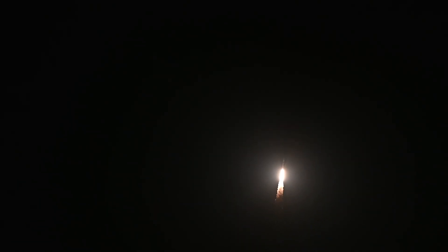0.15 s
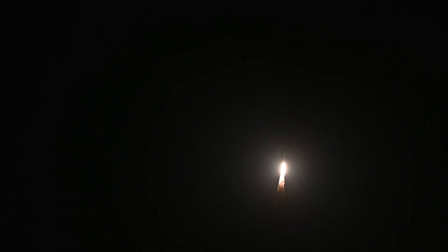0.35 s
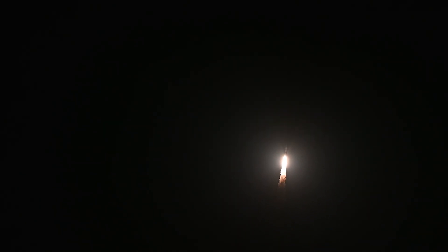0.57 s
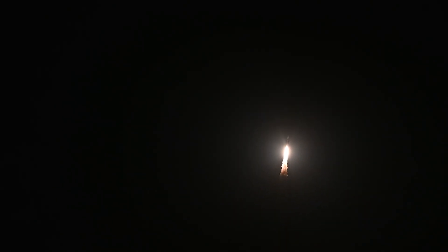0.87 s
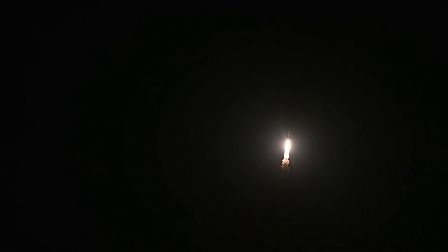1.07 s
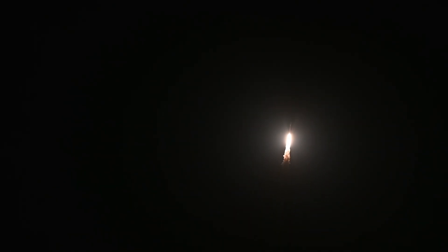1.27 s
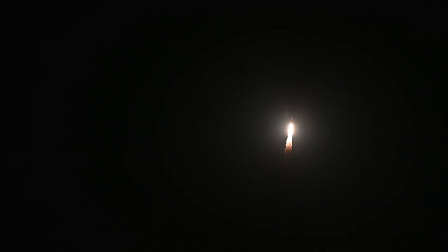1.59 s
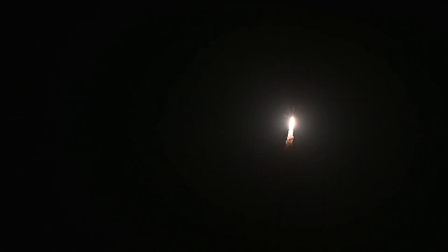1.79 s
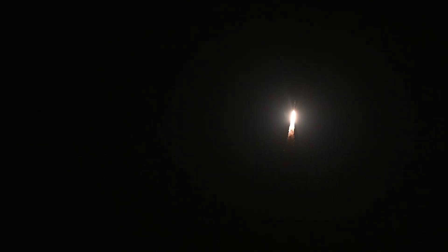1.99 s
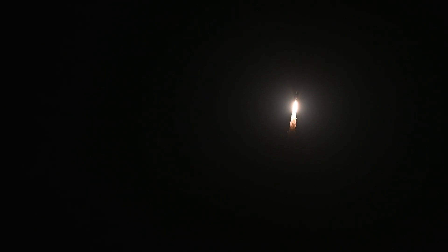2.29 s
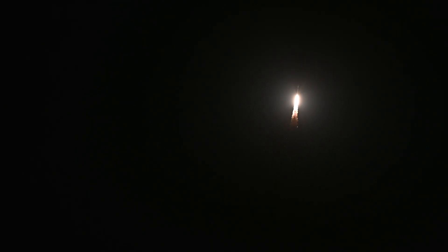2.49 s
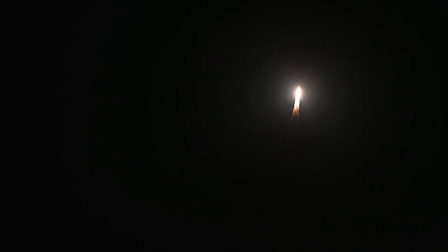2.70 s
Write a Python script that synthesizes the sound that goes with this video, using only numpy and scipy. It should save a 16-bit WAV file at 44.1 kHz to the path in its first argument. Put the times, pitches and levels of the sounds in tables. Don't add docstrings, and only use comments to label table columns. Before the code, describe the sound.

A distant rocket climbs at night, its deep roar rumbling steadily under ragged, sharpening crackle

```python
import sys
import numpy as np
from scipy import signal
from scipy.io import wavfile
from scipy.ndimage import uniform_filter1d

SR = 44100
rng = np.random.default_rng(int(sys.argv[2]) if len(sys.argv) > 2 else 0)


def volts(x):
    e = np.asarray(x, float) / 20
    return 10 ** e


def generate_wav(signal):
    frames = np.transpose(np.atleast_2d(signal))
    scaled = np.clip(frames, -1, 1) * 32767
    pcm = np.round(scaled).astype(np.int16)
    wavfile.write(sys.argv[1], SR, pcm)


N = 125685
LEAD_IN = 4096

# arrival in seconds, edge strength in dB, rise time in ms.
FRONTS_HAZY = [(0.0549, -35, 0.83), (0.0709, -30, 0.39), (0.0908, -40, 0.35), (0.1585, -31.5, 0.28),
               (0.1772, -37.5, 0.29), (0.1908, -38.5, 0.31), (0.2154, -33, 0.34), (0.2404, -35, 0.3),
               (0.2644, -36, 0.35), (0.2777, -31, 0.25), (0.29, -39, 0.19), (0.3103, -38.5, 0.79),
               (0.3373, -34.5, 0.27), (0.3473, -33.5, 0.29), (0.3612, -32.5, 0.79), (0.4107, -33.5, 0.225),
               (0.433, -47, 0.4), (0.4471, -43, 0.76), (0.4649, -35, 0.27), (0.4756, -33.5, 0.44),
               (0.4935, -34.5, 0.97), (0.5119, -30.5, 0.35), (0.535, -37.5, 0.53), (0.5794, -42, 0.85),
               (0.5907, -32.5, 0.3), (0.6082, -35, 0.4), (0.622, -38.5, 0.74), (0.6368, -36, 0.48),
               (0.6677, -29, 0.45), (0.699, -32, 0.49)]
FRONTS_CLEARING = [(0.72, -44, 0.28), (0.73, -60.5, 0.4), (0.7629, -30.5, 0.24), (0.803, -43.5, 0.113),
                   (0.8161, -34, 0.34), (0.874, -37.5, 0.3), (0.8583, -37, 0.37), (0.9205, -41.5, 0.21),
                   (0.9453, -27, 0.24), (0.9764, -39, 0.24), (0.993, -38.5, 0.47), (1.0091, -33.5, 0.28),
                   (1.029, -41.5, 0.94), (1.0997, -31, 0.5), (1.1222, -29.5, 0.21), (1.1397, -32, 0.25),
                   (1.186, -37.5, 0.088), (1.206, -58, 0.3), (1.2168, -34.5, 0.082), (1.2453, -37.5, 0.35),
                   (1.279, -32, 0.11), (1.2902, -30.5, 0.89), (1.3043, -44, 0.32), (1.3214, -59.5, 0.45),
                   (1.3321, -29.5, 0.34), (1.3533, -58, 0.89), (1.3888, -26.5, 0.31), (1.4119, -29.5, 0.24),
                   (1.4551, -35, 0.46), (1.481, -29, 0.24)]
FRONTS_BURST = [(1.5028, -26.5, 0.35), (1.514, -56.5, 1), (1.5218, -36.5, 0.73), (1.553, -38, 0.8),
                (1.5632, -36, 0.7), (1.6101, -33.5, 0.49), (1.6235, -34.5, 0.72), (1.6397, -34.5, 0.69),
                (1.6572, -30.5, 0.3), (1.678, -30, 0.46), (1.694, -35.5, 0.82), (1.717, -29.5, 0.42),
                (1.7364, -34, 0.64), (1.7621, -22, 0.12), (1.789, -18.5, 0.1), (1.815, -30.5, 0.2),
                (1.8287, -28.5, 0.61), (1.8645, -31.5, 0.45), (1.8827, -38, 0.29), (1.9064, -23, 0.28),
                (1.9217, -24, 0.17), (1.949, -68, 0.327), (1.9584, -26, 0.26), (1.9828, -21, 0.16),
                (1.9953, -30.5, 1), (2.0166, -32, 0.49), (2.0324, -24.5, 0.19), (2.0592, -28, 0.27),
                (2.0745, -41, 0.45), (2.0958, -35.5, 0.4)]
FRONTS_CLEAR = [(2.125, -25, 0.15), (2.145, -25, 0.16), (2.1958, -32, 0.3), (2.2219, -25.5, 0.21),
                (2.2329, -29.5, 0.2), (2.2431, -26.5, 0.2), (2.263, -30, 0.21), (2.285, -19.5, 0.071),
                (2.3036, -37, 0.81), (2.3178, -26.5, 0.36), (2.3607, -28.5, 0.49), (2.4066, -31.5, 0.42),
                (2.4237, -36, 0.45), (2.4529, -27.5, 0.15), (2.5045, -22.5, 0.19), (2.5315, -35.5, 0.17),
                (2.5685, -22, 0.14), (2.6011, -38, 0.23), (2.612, -40.5, 0.36), (2.6342, -32.5, 0.47),
                (2.648, -36, 0.41), (2.686, -49, 0.35), (2.7079, -23, 0.4), (2.7202, -33.5, 0.68),
                (2.7319, -30.5, 0.35), (2.7675, -21, 0.18), (2.7824, -31.5, 0.34), (2.797, -43, 0.32),
                (2.8064, -28, 0.36), (2.8267, -32, 0.63)]
FRONTS_BETWEEN = [(1.8602, -29, 0.4), (2.2078, -37, 0.39), (2.4428, -39, 0.17), (2.8412, -29, 0.35)]

# delay in ms, signed gain.
REFLECTIONS = [
    (.55, 0.2),
    (3.3, 0.25),
    (5.0, 0.098),
    (8.8, 0.1),
    (26, 0.17),
]

# time in seconds, depth in dB, half width in ms.
POCKETS_HAZY = [(0.0557, -19, 0.85), (0.0703, -18, 1.2), (0.1305, -17, 0.77), (0.2151, -15.5, 0.78),
                (0.2781, -16, 0.76), (0.2906, -16, 0.78), (0.3363, -17.5, 2), (0.3618, -20, 1),
                (0.3798, -25, 1), (0.4422, -30, 2.1), (0.4656, -18, 0.81), (0.4934, -17.5, 0.75),
                (0.5046, -18, 0.9), (0.5124, -18, 1.03), (0.5279, -22, 1), (0.577, -15, 2.1),
                (0.58, -14, 0.9), (0.595, -22, 0.64), (0.6079, -25, 2), (0.6162, -23, 1),
                (0.6682, -18, 0.64), (0.6716, -18.5, 1), (0.7658, -18, 0.69), (0.7775, -19.5, 1.35),
                (0.8527, -22.5, 2.3), (1.0346, -18.5, 1.4), (1.0994, -18, 1.9), (1.1461, -17.5, 1.66),
                (1.2495, -25, 2.4), (1.3192, -23, 1.4), (1.3912, -15, 0.94), (1.413, -26, 1.5),
                (1.4424, -25, 2.9), (1.4831, -21, 1), (1.6381, -16.5, 1.6), (1.6595, -21, 1.2),
                (1.7227, -18.6, 1.5), (1.7643, -15.3, 0.75)]
POCKETS_CLEAR = [(1.7908, -15.5, 0.66), (1.8173, -18, 0.6), (1.8292, -14, 1), (1.8888, -22, 1.2),
                 (1.9236, -16, 0.76), (1.9602, -17.5, 0.79), (1.9843, -18.5, 0.62), (1.9975, -17.5, 0.73),
                 (2.0144, -19.5, 0.85), (2.034, -16.5, 0.74), (2.0614, -19, 1), (2.1082, -21.5, 1.9),
                 (2.1271, -16.5, 0.83), (2.137, -21.0, 0.84), (2.1471, -14.2, 0.75), (2.1822, -20, 0.86),
                 (2.2235, -12.6, 0.87), (2.2344, -14, 0.83), (2.2449, -13, 0.93), (2.2613, -17.5, 0.74),
                 (2.2866, -12.5, 0.77), (2.2918, -14, 0.97), (2.3194, -16.7, 1.1), (2.4457, -21.5, 1.3),
                 (2.4545, -14.5, 0.67), (2.488, -18.3, 1.3), (2.5083, -16, 0.75), (2.534, -22, 1.1),
                 (2.569, -15.5, 1.4), (2.635, -18, 1.65), (2.6657, -19, 0.82), (2.7079, -13.5, 1.2),
                 (2.7212, -15.5, 1.3), (2.7353, -16.3, 1.05), (2.7686, -13, 1.1), (2.784, -19.5, 1.4),
                 (2.813, -18, 1.4), (2.8422, -16, 1.45)]
POCKET_FINAL = [
    (2.8519, -9.5, 1.25),
]

# frequency in Hz, gain in dB.
AIR_COLOUR = [(15, -38.5), (70, 2.5), (300, -0.5), (1200, -4), (2700, -11), (4500, -17), (7000, -15.5),
              (20000, -42.5)]

# time in seconds, rumble level in dB.
THRUST_LEVEL = [(0.0, -27), (0.06, -26), (0.1, -27.5), (0.32, -24), (0.33, -25), (0.38, -28.5), (0.46, -24),
                (0.49, -28.5), (0.59, -24.5), (0.63, -27), (1.26, -27), (1.29, -27.5), (1.32, -27.5),
                (2.01, -28.5), (2.06, -27.5), (2.29, -29), (2.33, -29.5), (2.85, -26.5)]

# frequency in Hz, gain in dB.
RUMBLE_COLOUR = [(12, -36), (24, -13.5), (68, 3.5), (300, -5.5), (520, -14), (1300, -28.5), (2500, -48.5),
                 (5000, -83.5)]

# frequency in Hz, gain in dB.
MICROPHONE_COLOUR = [(8, -37.5), (35, -1), (3100, 0), (3850, 3), (4400, -3), (4900, -9), (6500, -17),
                     (20000, -27)]

SHOCK_DB, SHOCK_MS, LEAD_S, ONSET_MS = 19, 0.39, 0.00027, 1.5
EDGE_KHZ = 1.464
ECHO_BLUR_MS, ECHO_WANDER, ECHO_SWAY = 0.021, 0.0684, 0.37
HAZE_DB, HAZE_MS, CLEAR_AT_S, CLEARING_S = -4, 0.15, 1.76, 0.6
SPLINTER_DB, SPLINTER_T60_S, SPLINTER_HZ = -2.5, 0.024, 1300
HAIL_PER_S, HAIL_DB, HAIL_GROWTH_DB_PER_S = 620, -46, 2.1
HAIL_SPREAD_DB, CLUMP_DB, HAIL_MS, HAIL_RISE_MS = 3.5, 2.5, 1, 0.062
POCKET_ECHO_MS, POCKET_ECHO_GAIN, POCKET_SPREAD = 5.0, 0.33, 1.2
POCKET_SKEW = 0.35
SCATTER_DB, SCATTER_T60_S, SCATTER_HZ, CLEARING_DB_PER_S = -11.5, 0.093, 5700, 6
RUMBLE_DB, PATCHY_DB, DEEP_HZ, DEEPEN_DB_PER_S = 1.22, 1, 42, 4.5
GROUND_GAIN = 0.15
SIDE_DB, HISS_DB, HISS_GROWTH_DB_PER_S = -36, -92, 7


def evened(x):
    return x / np.sqrt(np.mean(x ** 2) + 1e-20)


def read(points, hz):
    point_hz, db = np.transpose(points)
    return np.interp(np.log(hz + 1), np.log(point_hz + 1), db)


def add(mix, s, sound):
    part = mix[round(s * SR):][:len(sound)]
    part += sound[:len(part)]


def causal(points, size=8192):
    log_gain = np.log(volts(read(points, np.fft.rfftfreq(size, 1 / SR))))
    full = np.concatenate([log_gain, log_gain[-2:0:-1]])
    return np.fft.ifft(np.exp(np.conj(signal.hilbert(full)))).real[:size // 2]


def front(length_ms, rise_ms, wander):
    ms = np.arange(2000) * 1000 / SR - ONSET_MS
    out = 0
    for (delay_ms, gain), w in zip([(0.042, 0.98)] + REFLECTIONS, wander):
        late_ms = ms - delay_ms * (1 + ECHO_WANDER * w)
        edge_ms = rise_ms + ECHO_BLUR_MS * (delay_ms > 1)
        sway = 1 + ECHO_SWAY * np.sin(40 * w) * (delay_ms > 0)
        u = np.logaddexp(0, 9.04 * late_ms / edge_ms) * edge_ms / 8.8 / length_ms
        jump = (1 + np.tanh(3.73 * late_ms / edge_ms)) / 2
        out = out + gain * sway * (1 - u) * np.exp(-u) * jump
    loss = np.pi ** 2 * EDGE_KHZ * rise_ms / 4.0
    return out * np.sinh(loss) / loss


def shocks():
    rows = np.vstack([FRONTS_HAZY, FRONTS_CLEARING, FRONTS_BURST, FRONTS_CLEAR, FRONTS_BETWEEN])
    out = np.zeros(N)
    t = np.arange(800) / SR
    taps = rng.standard_normal((len(rows), 800)) ** 3 * volts(-60 * t / SPLINTER_T60_S)
    taps = taps / np.linalg.norm(taps, axis=1, keepdims=True)
    taps = signal.lfilter(*signal.butter(1, SPLINTER_HZ, "high", fs=SR), taps)
    wanders = rng.standard_normal((len(rows), len(REFLECTIONS) + 1))
    for (s, db, rise_ms), wander, tap in zip(rows, wanders, taps):
        haze = np.clip((CLEAR_AT_S - s) / CLEARING_S, 0, 1)
        hazy_rise_ms = np.clip(np.hypot(rise_ms, HAZE_MS * haze), 0.03, 0.7)
        jump = front(SHOCK_MS, hazy_rise_ms, wander)
        splinters = signal.oaconvolve(jump, tap)[:len(jump)]
        jump = volts(HAZE_DB * haze) * jump + volts(SPLINTER_DB + 2.5 * haze) * splinters
        add(out, s - LEAD_S - ONSET_MS / 1000, volts(db + SHOCK_DB) * jump)
    return out


def pockets():
    ms = np.arange(-300, 700) * 1000 / SR
    out = np.zeros(N)
    for s, db, width_ms in np.vstack([POCKETS_HAZY, POCKETS_CLEAR, POCKET_FINAL]):
        echo_u = (ms - POCKET_ECHO_MS) / (width_ms * POCKET_SPREAD)
        u = np.array([ms / width_ms, echo_u])
        shape = (u ** 2 - 1 - POCKET_SKEW * u) * np.exp(-u ** 2 / 2)
        add(out, s - 300 / SR, volts(db) * np.dot([1, POCKET_ECHO_GAIN], shape))
    return out


def hail():
    clump = uniform_filter1d(rng.standard_normal(N), 900)
    clump = evened(uniform_filter1d(clump, 900))
    spread = np.minimum(rng.exponential(1, N), 3.5)
    growth_db = HAIL_GROWTH_DB_PER_S * np.arange(N) / SR
    size = volts(HAIL_SPREAD_DB * spread + CLUMP_DB * clump + growth_db)
    size = size * (rng.random(N) < HAIL_PER_S / SR)
    kind = rng.integers(0, 12, N)
    out = np.zeros(N)
    for k, draw in enumerate(rng.standard_normal((12, len(REFLECTIONS) + 2))):
        small = front(HAIL_MS * np.exp(0.13 * draw[0]), HAIL_RISE_MS, draw[1:])
        out += signal.oaconvolve(size * (kind == k), small)[:N]
    return volts(HAIL_DB) * out


def scatter(x):
    t, at_s = np.arange(3000) / SR, np.arange(N) / SR
    band = signal.butter(1, [300, SCATTER_HZ], "band", fs=SR)
    out = 0
    for k, taps in enumerate(rng.standard_normal((3, 3000))):
        tail = signal.lfilter(*band, taps) * volts(-60 * t / SCATTER_T60_S) * (t > 0.001)
        share = np.cos(2 * np.pi * (9 * at_s + k / 3)) * np.sqrt(2 / 3)
        out = out + signal.oaconvolve(x * share, tail / np.linalg.norm(tail))[:N]
    return volts(SCATTER_DB - CLEARING_DB_PER_S * (at_s - 0.93)) * out


def rumble():
    frames = (N + LEAD_IN) // 512 + 5
    hz = np.fft.rfftfreq(2048, 1 / SR)
    a, b, patches = rng.standard_normal((frames, 1025, 3)).T
    patches = evened(uniform_filter1d(uniform_filter1d(patches, 8, 0), 5, 1))
    deep = 1 / (1 + (hz / DEEP_HZ) ** 4)
    deepen_db = DEEPEN_DB_PER_S * np.outer(deep, np.arange(frames) * 512 / SR - 2)
    z = (a + 1j * b) * volts(read(RUMBLE_COLOUR, hz)[:, None] + PATCHY_DB * patches + deepen_db)
    roar = evened(signal.istft(z, nperseg=2048, noverlap=1536)[1][:N + LEAD_IN])
    s, db = np.transpose(THRUST_LEVEL)
    return roar * volts(RUMBLE_DB + np.interp(np.arange(-LEAD_IN, N) / SR, s, db))


def grounded(x):
    late = round(REFLECTIONS[1][0] * SR / 1000)
    return x + GROUND_GAIN * np.roll(x, late)


def scene():
    fronts = shocks() + hail()
    crackle = signal.oaconvolve(fronts + scatter(fronts), causal(AIR_COLOUR))[:N]
    mono = np.pad(crackle + pockets(), (LEAD_IN, 0)) + grounded(rumble())
    mono = signal.oaconvolve(mono, causal(MICROPHONE_COLOUR))[LEAD_IN:LEAD_IN + N]
    return np.array([mono, mono])


def roll_off(x):
    return signal.sosfilt(signal.butter(12, 12700, fs=SR, output="sos"), x)


def record(dry):
    side = volts(SIDE_DB) * (0.44 * dry[0] + 4 * np.gradient(dry[0]))
    hiss = uniform_filter1d(rng.standard_normal((3, N)), size=2, axis=1)
    hiss = uniform_filter1d(hiss, size=3, axis=1)
    hiss_db = HISS_DB + HISS_GROWTH_DB_PER_S * np.arange(N) / SR
    hiss = volts(hiss_db) * (hiss[0] + 0.15 * hiss[1:])
    return roll_off(dry + np.array([side, -side]) + hiss)


dry = scene()
out = record(dry)
generate_wav(out)
```